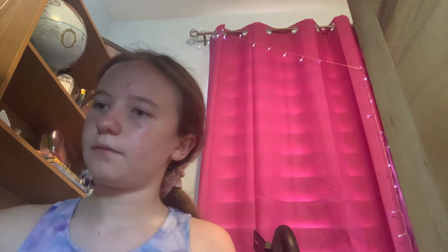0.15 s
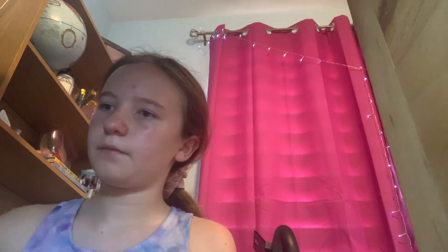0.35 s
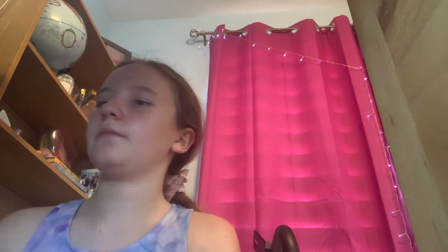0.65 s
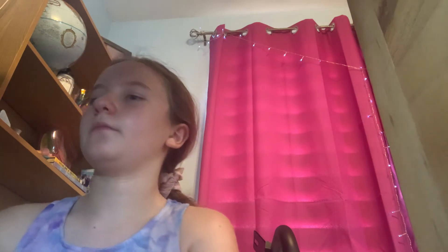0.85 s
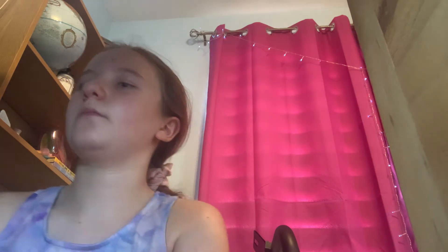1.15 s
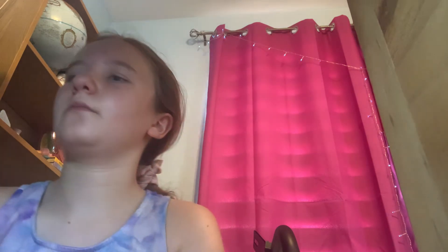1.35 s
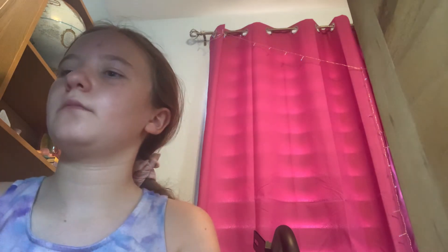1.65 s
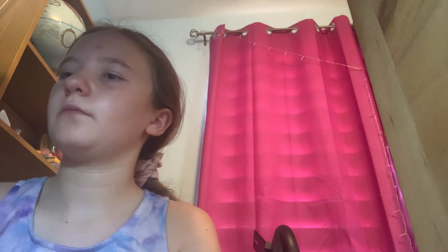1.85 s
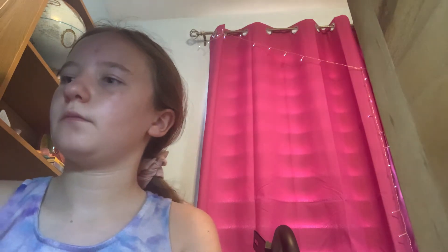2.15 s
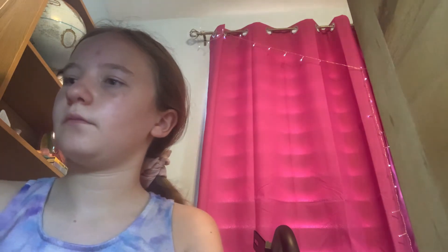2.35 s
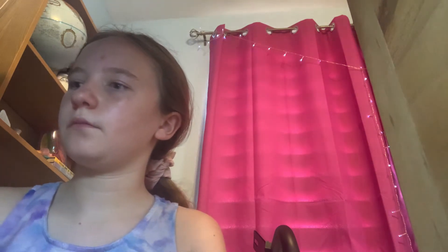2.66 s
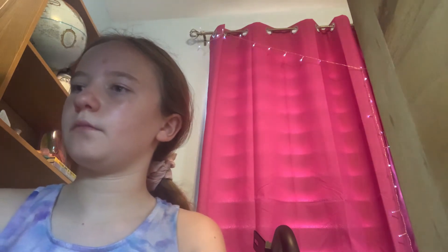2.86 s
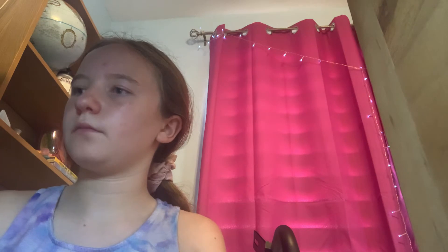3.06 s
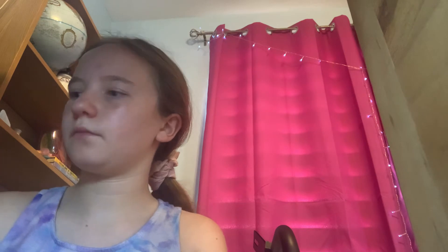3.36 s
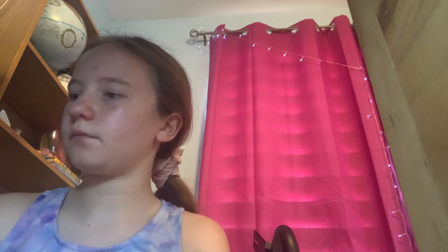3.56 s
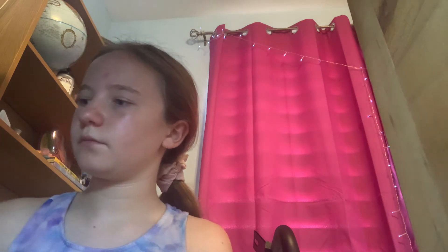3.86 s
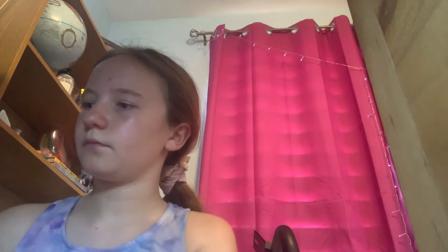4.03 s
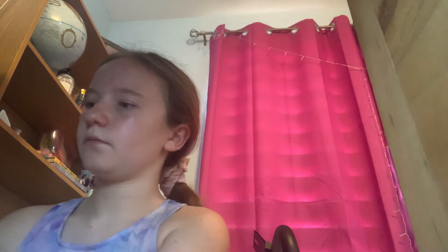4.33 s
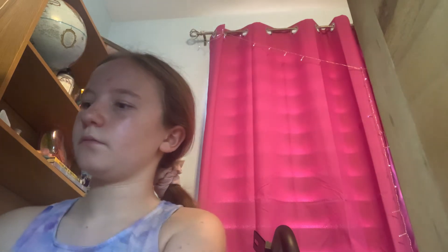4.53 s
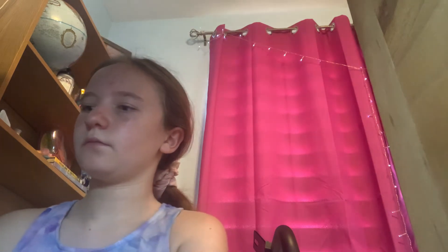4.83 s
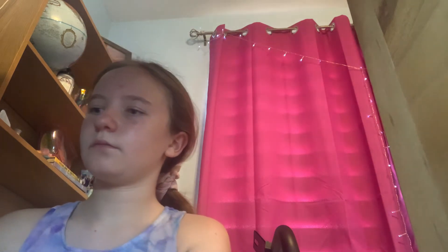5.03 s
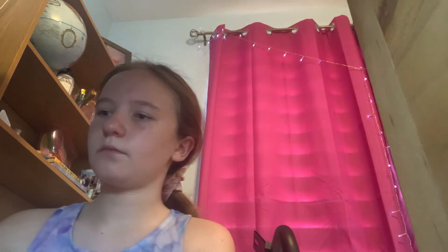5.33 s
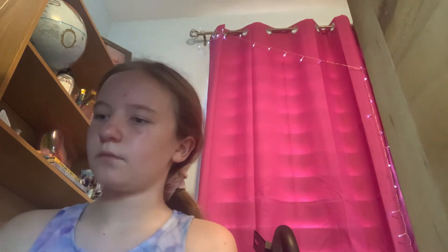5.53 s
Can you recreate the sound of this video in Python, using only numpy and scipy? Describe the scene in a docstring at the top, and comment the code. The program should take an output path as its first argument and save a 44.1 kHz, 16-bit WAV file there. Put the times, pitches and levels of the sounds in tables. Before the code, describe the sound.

A quiet small room with soft air and microphone hiss, faint hum and a thin high whine. From 0 to about 1.2 s, keychains turn in the hand close by, giving tiny irregular metallic clinks and grainy finger rubs. Very soft nudges come near 1.3 s, then a firm, low wooden desk thud at 1.55 s with small ticks. From 1.66 to 1.9 s something drags over the wood in short murmuring scrapes. Bumps and ticks cluster around 1.95-2.15 s, and at 2.19 s a loud, bright, hard double knock lands with a brief jangling spray. The charm rocks from 2.3 to 2.6 s, its taps quickening, dulling and fading. Faint scrapes follow at 2.8-3.05 s, then near silence. Soft rubbing and a nudge return around 3.9 s; a second keychain drags and clatters at 4.25-4.45 s, ending in a duller clack at 4.57 s. Quiet remains, with barely audible ticks at 5.35 and 5.55 s.

```python
"""A small room with a wooden desk, where keychains are put down close to the microphone.
They clink in the hand, the desk is bumped, and one lands with a sharp knock and rocks to rest.
A second one is dragged over the wood, clatters and is set down with a duller clack.
Impacts are decaying modes with a crack of noise; rubbing is coloured noise with tiny catches.
Bending waves in the desk, reflections of the room and a quiet background complete the sound."""
import sys
import numpy as np
from scipy import signal
from scipy.fft import rfft, irfft
from scipy.io import wavfile
from scipy.ndimage import uniform_filter1d

SR = 44100
rng = np.random.default_rng(int(sys.argv[2]) if len(sys.argv) > 2 else 0)


def store_pcm(level_fs):
    """Save levels as 16-bit WAV."""
    pcm = np.round(np.clip(level_fs, -1, 1) * 32767).astype(np.int16)
    wavfile.write(sys.argv[1], SR, np.atleast_2d(pcm).T)


N = 250959
TIME = np.arange(N) / SR


def amp(db):
    """Logarithmic level: decibels to amplitude gain."""
    return 10 ** (np.asarray(db) / 20)


def evened(x):
    """Power normalization: scales to rms 1."""
    return x / np.sqrt(np.mean(x ** 2) + 1e-20)


def read(points, hz, axis=1):
    """Interpolation on a logarithmic frequency axis: reads one column of a table."""
    table = np.transpose(points)
    return np.interp(np.log(hz + 1), np.log(table[0] + 1), table[axis])


def coloured(x, spectrum):
    """Spectral shaping: weights x by a spectrum and scales it to rms 1."""
    gain = amp(read(spectrum, np.fft.rfftfreq(len(x), 1 / SR)))
    return evened(irfft(rfft(x) * gain, len(x)))


def filtered(x, hz, kind, order=2):
    """Butterworth filtering: a maximally flat low-pass or high-pass."""
    corner_hz = np.clip(hz, 10, SR / 2 - 1000)
    return signal.sosfilt(signal.butter(order, corner_hz, kind, fs=SR, output="sos"), x)


def add(mix, s, sound):
    """Superposition: mixes a sound in at time s."""
    part = mix[max(round(s * SR), 0):][:len(sound)]
    part += sound[:len(part)]


VARY_DB = 1.5  # how far the spot struck can raise or lower each mode


def strikes(rows, modes, crack_db, crack_t60, crack_low_hz, detune=0.027, order=3,
            count=0, flurry_s=.01, flurry_db=-6):
    """Modal excitation: each blow rings the modes and a brief crack, under its contact's low-pass corner."""
    out, t = np.zeros(N), np.arange(SR // 3) / SR
    hz, db, t60 = np.transpose(modes)[:, :, None]
    # neighbouring low modes start out of step, so the blow builds up briefly
    lag = np.arange(len(modes))[:, None] * np.pi * 3 / 4
    for s, level_db, corner_hz in rows:
        # every blow lands on another spot or part
        place, part = rng.uniform(-1, 1, (2, len(modes), 1))
        phase = np.where(hz > 1400, rng.uniform(0, 2 * np.pi, hz.shape), -lag)
        decay = amp(db + VARY_DB * place - 60 * t / t60)
        ring = (decay * np.cos(2 * np.pi * hz * (1 + detune * part) * t + phase)).sum(0)
        noise = rng.standard_normal(len(t)) * amp(-60 * t / crack_t60)
        crack = filtered(noise, crack_low_hz, "high")
        impact = ring / np.linalg.norm(ring) + amp(crack_db) * crack / np.linalg.norm(crack)
        first = filtered(impact, corner_hz, "low", order)
        blow = first.copy()
        # loose parts follow in a weaker flurry
        for late in rng.uniform(0.08, 1, count):
            add(blow, late * flurry_s, first * amp(flurry_db * late) * rng.choice([-1, 1]))
        # the level is the rms of the loudest 4 ms
        loudest = np.sqrt(uniform_filter1d(blow ** 2, size=176, mode="constant").max())
        add(out, s, amp(level_db) * blow / loudest)
    return out


def scatter(start, length, per_s, level_db, corner_hz, spread_db=3):
    """Jittered point process: contacts at uneven times and strengths, as (s, level dB, corner Hz)."""
    count = max(round(length * per_s), 0)
    return [(start + length * (k + when) / count, level_db + spread_db * (2 * size - 1), corner_hz)
            for k, (when, size) in enumerate(rng.random((count, 2)))]


def friction(spectrum, catches_per_s, spread_db, smooth_db):
    """Asperity contact: tiny catches of uneven size over a smooth rubbing noise, at rms 1."""
    happens = rng.random(N) < catches_per_s / SR
    sizes = amp(spread_db * np.minimum(rng.exponential(1, N), 3))
    catches = happens * rng.choice([-1, 1], N) * sizes
    return coloured(evened(catches) + amp(smooth_db) * rng.standard_normal(N), spectrum)


# the charm lands on one edge, then slaps flat: (time [s], level [dB], contact corner [Hz])
KNOCK_BLOWS = [(2.1914, -12, 6589), (2.1943, -10.5, 9200), (2.1970, -25, 3594), (2.209, -28.5, 8000),
               (2.2195, -33.5, 5200), (2.228, -36.5, 5500)]
# resonances of the charm: (frequency [Hz], level [dB], t60 [s])
CHARM_RESONANCES = [(338, -8, 0.05), (654, -13, 0.06), (940, -2, 0.021), (1530, 0, .015),
                    (2360, -12.5, .035), (2880, -6, 0.019), (3250, -4, 0.014), (3530, 0, 0.024),
                    (4070, 4, 0.0077), (4470, 5, 0.018), (5300, -1.5, 0.0085), (5830, -0.5, 0.021),
                    (8060, -4.5, .012), (8850, -0.5, 0.012), (10270, -5, 0.014), (11000, -9, 0.021)]


def knocking():
    """Hard impact: the landing charm rings its own short, bright modes."""
    return strikes(KNOCK_BLOWS, CHARM_RESONANCES, crack_db=-3.5, crack_t60=0.043, crack_low_hz=1490,
                   detune=0.0052, order=4)


# spectrum of the chain's spray: (frequency [Hz], relative density [dB per Hz])
SPLASH_SPECTRUM = [(500, -17.5), (1500, -2.5), (3500, 0), (5500, -1), (7000, -7.5), (9000, -10),
                   (11500, -14), (15000, -34)]
SPLASH_TOP_HZ, SPLASH_TOP_T60 = 8000, .28  # above this frequency the spray dies sooner [s]


def splash(level_db=-32.5, t60=0.38):
    """Frequency-dependent damping: the knock shakes the chain into a spray whose top dies first."""
    since = np.maximum(TIME - KNOCK_BLOWS[1][0], 0)
    spray = friction(SPLASH_SPECTRUM, catches_per_s=1200, spread_db=2.5, smooth_db=-6)
    top = irfft(rfft(spray) * (np.fft.rfftfreq(N, 1 / SR) > SPLASH_TOP_HZ), N)
    body = spray - top
    fading = body * amp(-60 * since / t60) + top * amp(-60 * since / SPLASH_TOP_T60)
    return (since > 0) * amp(level_db) * fading


ROCK_START_S = 2.3355
FIRST_GAP_S, LAST_GAP_S, GAP_KEPT = .033, .0195, .7  # the gap shrinks geometrically to its last value
ROCK_DB, ROCK_LOSS_DB = -27.5, 2.4  # first contact, and the loss at each further one
ROCK_CORNER_HZ, CORNER_KEPT = 2280, 0.85  # first corner, and the share each further contact keeps
LIMP_DB = 10.5  # limit of the growing extra loss on every second contact, on the lighter edge


def settling(count=14):
    """Energy loss at impact: the charm rocks edge to edge, ever faster and duller, as it comes to rest."""
    k = np.arange(count)
    gaps = LAST_GAP_S + (FIRST_GAP_S - LAST_GAP_S) * GAP_KEPT ** k
    times = ROCK_START_S + np.cumsum(gaps) - gaps
    limp = (k % 2) * (1 - GAP_KEPT ** k)
    levels_db = ROCK_DB - ROCK_LOSS_DB * k - LIMP_DB * limp
    return list(zip(times, levels_db, ROCK_CORNER_HZ * CORNER_KEPT ** k))


BEND_S = .0036  # 1 kHz travel time; all delays are then taken relative to the fastest wave


def through_desk(x, size=4096):
    """Dispersion: bending waves carry the treble faster than the bass, so each blow sweeps down."""
    hz = np.fft.rfftfreq(size, 1 / SR)
    lag = BEND_S * np.sqrt(1000 / np.clip(hz, 350, 5000))
    # phase is the running sum of delay over frequency
    sweep = irfft(np.exp(-2j * np.pi * np.cumsum(lag - lag.min()) * hz[1]), size)
    return signal.fftconvolve(x, np.roll(sweep, size // 2))[size // 2:][:N]


# the charm's edges touch the wood just before the knock and in the first rocking after it:
# (time [s], level [dB], contact corner [Hz])
EDGE_TOUCHES = [(2.130, -37.5, 3370), (2.149, -24, 2150), (2.197, -26, 996), (2.219, -25.5, 2086),
                (2.232, -27.5, 1220), (2.249, -28.5, 2280), (2.255, -28, 2030), (2.289, -36.5, 1940),
                (2.2995, -28, 1866)]
# resonances of the rocking contacts: (frequency [Hz], level [dB], t60 [s])
ROCK_RESONANCES = [(225, -8, .06), (315, -3.5, .045), (430, -1, .04), (675, -.5, .04), (870, -1.5, .035),
                   (1005, -3, .025), (1430, -4, .018), (1570, 0, .02), (2000, -10, .018), (2420, -6, .024),
                   (2900, -5, .022), (3500, -6, .016)]


def rocking():
    """Repeated impact: edge touches and settling contacts ring the modes through the dispersive desk."""
    contacts = strikes(EDGE_TOUCHES + settling(), ROCK_RESONANCES, crack_db=-7, crack_t60=.05,
                       crack_low_hz=260, detune=.025, count=1, flurry_s=.005, flurry_db=-11)
    return through_desk(contacts)


# a keychain bumping on the wood: (time [s], level [dB], contact corner [Hz])
CLACK_BLOWS = [(1.424, -53.5, 1110), (1.689, -47, 890), (1.752, -44, 1170), (1.794, -50, 2180),
               (1.9815, -30, 2620), (2.005, -38, 2598), (3.019, -55, 1410), (3.054, -61, 1400),
               (3.962, -52, 890), (4.245, -47, 1596), (4.332, -31, 2500), (4.355, -32, 1840),
               (4.386, -34.5, 2000), (4.397, -37.5, 1700), (4.407, -30.5, 2180), (4.419, -36.5, 1400),
               (4.572, -20.5, 2802), (4.577, -30, 940), (4.586, -29, 1184), (4.597, -33.5, 998)]
# resonances of the clacks: (frequency [Hz], level [dB], t60 [s])
CLACK_RESONANCES = [(131.52, -18.5, 0.27), (296.31, -7, 0.026), (497, -3, 0.072), (610, -2.5, 0.057),
                    (810, 1, 0.023), (1156, 2, 0.024), (1410, -3, 0.016), (1990, -1, 0.016),
                    (2320, -3, 0.017), (2820, -0.5, 0.0092), (4400, -5, 0.024)]
SKIPS_PER_S, SKIP_DB, SKIP_CORNER_HZ = 55, -5.5, 1140  # level relative to the rub


def clacking():
    """Soft impact: a keychain bumps on the wood, and skips on it while a push holds."""
    skips = []
    for start, rise, hold, _, rub_db, _, _ in PUSHES:
        skips += scatter(start + rise, hold, SKIPS_PER_S, rub_db + SKIP_DB, SKIP_CORNER_HZ)
    bumps = strikes(CLACK_BLOWS + skips, CLACK_RESONANCES, crack_db=-9.5, crack_t60=0.19,
                    crack_low_hz=400, detune=0.033, count=2, flurry_s=0.011, flurry_db=-14.0)
    return through_desk(bumps)


# resonances of the desk top: (frequency [Hz], level [dB], t60 [s])
DESK_RESONANCES = [(60.9, -26, 0.53), (121, -13, 0.22), (187.5, 2, 0.099), (228, -18.5, 0.46),
                   (280, 4.5, 0.059), (367, -1, 0.048), (587, -1.5, 0.045), (677.1, -8, 0.098),
                   (820, -16, 0.086), (1274, -13, 0.04)]
# a firm blow on the desk top: (time [s], level before the high-pass [dB], contact corner [Hz])
THUD_BLOWS = [(1.5558, -7, 948.6)]


def thudding():
    """Plate resonance: a firm blow excites the low modes of the desk top."""
    blow = strikes(THUD_BLOWS, DESK_RESONANCES, crack_db=-15.0, crack_t60=0.22, crack_low_hz=300)
    return filtered(blow, 140, "high")


# soft nudges against the desk: (time [s], level before the high-pass [dB], contact corner [Hz])
THUMP_BLOWS = [(1.294, -50.5, 71.5), (1.347, -47.5, 113), (1.447, -48, 108), (1.934, -23.5, 171),
               (1.969, -23, 181), (1.987, -21, 205), (2.205, -33.5, 174), (2.255, -31, 173.9),
               (3.963, -41, 111.2), (4.280, -38, 109.5), (4.577, -34.5, 142.1)]


def thumping():
    """Contact low-pass: soft nudges excite the same plate with almost no treble."""
    nudges = strikes(THUMP_BLOWS, DESK_RESONANCES, crack_db=-18.0, crack_t60=.15, crack_low_hz=120.15)
    return filtered(nudges, 45, "high")


# rings and links striking the wood: (time [s], level [dB], contact corner [Hz])
TICK_BLOWS = [(1.555, -46, 6000), (1.566, -41.5, 6493), (1.584, -42.5, 4970), (1.6002, -27.5, 8400),
              (1.603, -36.5, 9000), (1.657, -63, 4200), (1.722, -58, 4200), (1.745, -54.5, 4460),
              (1.794, -56.5, 5400), (1.832, -61.5, 5000), (1.946, -51.5, 4400), (1.964, -40.5, 5370),
              (1.970, -46, 4438), (1.981, -29.5, 4387), (2.004, -39.5, 4380), (2.024, -49.5, 9000),
              (2.036, -47, 3633), (2.041, -43, 3659), (2.047, -39, 4500), (2.051, -43.5, 9960),
              (2.058, -49, 4200), (2.075, -51, 3200), (2.085, -51, 4208), (2.131, -44, 4375),
              (2.143, -38, 6043), (2.157, -37, 4380), (2.308, -46, 12100), (2.474, -59.5, 5990),
              (4.351, -37.5, 7500), (4.356, -38, 10700), (5.346, -63, 13000), (5.542, -59, 13000)]
# resonances of the rings and links: (frequency [Hz], level [dB], t60 [s])
LINK_RESONANCES = [(2200, -8, .015), (2620, -7, .016), (2980, -7, .02), (3720, 2, .016), (4260, -1, .013),
                   (5050, -1, .016), (5750, -3, .012), (8400, -7, .008), (9900, -5, .008)]
LINKS_PER_S, LINK_CORNER_HZ = 80, 4490  # ticks of the trailing links


def ticking():
    """Small-body resonance: rings and links strike the wood, and trailing links tick while a push holds."""
    links = []
    for start, rise, hold, _, _, _, links_db in PUSHES:
        links += scatter(start + rise, hold, LINKS_PER_S, links_db, LINK_CORNER_HZ)
    return strikes(TICK_BLOWS + links, LINK_RESONANCES, crack_db=-4.5, crack_t60=0.035,
                   crack_low_hz=2200, detune=0.03, count=1, flurry_s=.004, flurry_db=-6)


# spectra of the murmuring wood and the hissing surface: (frequency [Hz], relative density [dB per Hz])
RUB_SPECTRUM = [(40, -20), (120, -1), (200, 4), (350, 8.5), (500, -7), (850, -4), (1100, -17.5),
                (1350, -12), (1800, -30), (3000, -29.5), (6000, -53)]
HISS_SPECTRUM = [(900, -9.5), (1800, -2.5), (3600, -3.5), (5600, -6), (7000, -13), (10000, -13.5),
                 (15500, -23)]
SWELL_DB = 16.5  # a push starts this far below its full level
GRIT_DB, GRIT_HZ = 2.8, 140  # depth of the level's jumps, and the upper limit of their rate
# pushes over the desk, each swelling, holding and dying away:
# (start [s], rise [s], hold [s], fade t60 [s], rub [dB], hiss [dB], links [dB])
PUSHES = [(1.662, 0.088, 0.1567, 0.58, -46.5, -70.5, -80), (1.933, 0.047, 0.032, 0.35, -45, -58.5, -46),
          (2.766, 0.038, 0.067, 0.43, -50.5, -69.5, -76), (3.012, 0.0083, .05, .2, -69.5, -78, -80),
          (3.88, 0.073, 0.044, 0.37, -55.5, -71, -64), (4.036, 0.008, 0.0088, 0.2, -56, -54.5, -66),
          (4.238, 0.008, 0.042, 0.21, -49, -64.5, -60), (4.29, 0.004, .02, 0.16, -55.5, -60.5, -60),
          (4.312, 0.058, 0.043, 0.3, -40.5, -55, -51.5), (4.442, 0.075, 0.067, 0.25, -44, -58, -56),
          (4.62, 0.033, 0.042, 0.82, -79, -70.5, -80)]


def sliding():
    """Stick-slip friction: a dragged keychain makes the wood murmur and its own surface hiss."""
    rub = filtered(friction(RUB_SPECTRUM, catches_per_s=1200, spread_db=2, smooth_db=-5.0), 86, "high")
    hiss = friction(HISS_SPECTRUM, catches_per_s=2500, spread_db=3, smooth_db=-2)
    wander = evened(filtered(rng.standard_normal(N), GRIT_HZ, "low"))
    grit = evened(amp(GRIT_DB * np.clip(wander, -2, 2)))
    out = np.zeros(N)
    for start, rise, hold, t60, rub_db, hiss_db, _ in PUSHES:
        t = TIME - start
        swell_db = -SWELL_DB * np.clip(1 - t / rise, 0, 1)
        fade_db = -60 * np.maximum(t - rise - hold, 0) / t60
        out += (t > 0) * amp(swell_db + fade_db) * (rub * amp(rub_db) + hiss * amp(hiss_db))
    return out * grit


SCRAPE_EDGE_S = .003  # how fast a jerk starts and stops
# the dragged charm catches and scrapes on in short jerks: (start [s], length [s], level [dB])
SCRAPE_JERKS = [(1.686, .014, -47.5), (1.744, .036, -44), (1.784, .016, -44), (1.816, .016, -42.5),
                (1.85, .012, -46.5), (1.867, .012, -47.5), (1.881, .036, -45.5), (2.002, 0.023, -41.5),
                (2.038, .024, -45.5), (2.815, 0.063, -51), (2.893, 0.02, -60.5), (2.925, 0.014, -62),
                (2.971, 0.0086, -57), (4.293, .018, -48)]
# resonances of the charm and the wood: (frequency [Hz], bandwidth [Hz], peak level [dB])
SCRAPE_RESONANCES = [(390, 70, 6), (525, 50, 0), (730, 60, 2), (870, 60, 0), (1060, 70, -7), (1310, 60, 1),
                     (2960, 130, -17), (3750, 450, -20), (5650, 400, -26)]


def scraping(catches_per_s=1100, spread_db=2.0):
    """Source and resonator: bursts of tiny catches ring the charm and the wood under it."""
    jerks = np.zeros(N)
    for start, length, db in SCRAPE_JERKS:
        to_edge = np.minimum(TIME - start, start + length - TIME)
        jerks += amp(db) * np.clip(to_edge / SCRAPE_EDGE_S, 0, 1)
    catches = friction([(40, 0), (7000, 0)], catches_per_s, spread_db, smooth_db=-3)
    t = np.arange(SR // 10) / SR
    body = sum(amp(db) * width * np.exp(-np.pi * width * t) * np.sin(2 * np.pi * hz * t)
               for hz, width, db in SCRAPE_RESONANCES)
    ringing = signal.fftconvolve(catches * jerks, body / np.linalg.norm(body))[:N]
    return filtered(ringing, 5300, "low", order=4)


CLINKS_PER_S = 35
# the fingers shift and set off small clinks at random:
# (start [s], length [s], mean level [dB], contact corner [Hz])
FINGER_SHIFTS = [(0.382, 0.147, -65.5, 9000), (0.572, 0.1555, -66, 10000), (0.745, 0.06, -71.5, 8300)]


def fidgeting():
    """Random excitation: small clinks of the keychains turning in the hand."""
    clinks = []
    for start, length, level_db, corner_hz in FINGER_SHIFTS:
        clinks += scatter(start, length, CLINKS_PER_S, level_db, corner_hz)
    return clinks


# the clearest clinks of links in the hand, farther off, and one brush of links on the desk near 4 s: (time [s],
# level [dB], contact corner [Hz])
JINGLE_BLOWS = [(.016, -53, 9000), (.046, -63, 6000), (.086, -65.5, 4500), (.193, -71, 6000),
                (.325, -56.5, 7960), (.360, -54, 7250), (.392, -53.5, 8900), (.474, -56, 12300),
                (.551, -57, 8800), (.628, -51.5, 9700), (.688, -57, 12000), (.711, -56.5, 1770),
                (.815, -63.5, 12200), (.889, -64, 6000), (.932, -67, 5000), (.976, -59, 6900),
                (.997, -51, 9800), (1.005, -59, 9000), (1.059, -60.5, 1623), (1.069, -63, 6000),
                (1.126, -64, 4500), (1.143, -63.5, 1990), (1.345, -56.5, 5000), (1.438, -55, 5000),
                (3.998, -59, 6958)]
# resonances of the links in the hand: (frequency [Hz], level [dB], t60 [s])
JINGLE_RESONANCES = [(988.3, -4, 0.0389), (1343, -17, 0.024), (2380, -13, 0.033), (3540, -5, 0.024),
                     (4260, 0, 0.01395), (5360, -3.5, 0.03), (8240, -0.5, 0.009)]


def jingling():
    """Metal resonance: links clink in the hand and once brush the desk, each clink followed by a weaker flurry."""
    return strikes(JINGLE_BLOWS + fidgeting(), JINGLE_RESONANCES, crack_db=0.5, crack_t60=0.036,
                   crack_low_hz=1487.7, detune=.1, order=2, count=2, flurry_s=0.0082, flurry_db=-8.0)


# fingers rubbing the keychains: (start [s], length [s], level [dB])
FINGER_RUBS = [(0.352, 0.067, -64.5), (0.603, 0.137, -64.5), (0.885, .035, -71), (1.042, 0.04, -68),
               (1.339, .035, -64), (1.411, .045, -64.5)]
# spectrum of that rubbing: (frequency [Hz], relative density [dB per Hz])
RUSTLE_SPECTRUM = [(500, -12.5), (800, 4), (1020, 8), (1400, -7.5), (2000, -9.5), (2800, -10.5),
                   (3800, -0.5), (5200, -7), (7000, -9.5), (10000, -14), (15000, -19)]


def rustling():
    """Amplitude-modulated friction: each turn in the hand is a grainy rub that swells and fades."""
    grain = friction(RUSTLE_SPECTRUM, catches_per_s=900, spread_db=3, smooth_db=-3)
    envelope = np.zeros(N)
    for start, length, db in FINGER_RUBS:
        progress = np.clip((TIME - start) / length, 0, 1)
        envelope += amp(db) * np.sqrt(np.abs(np.sin(np.pi * progress)))
    return grain * envelope


# decay and strength of the reflections: (frequency [Hz], t60 [s], level [dB])
ROOM_DECAY = [(80.38, 0.8, 6), (292, 0.47, -3.5), (700, 0.96, -9), (1510, 0.16, -5), (3460, 0.28, -3.5),
              (7880, 0.13, 1.5), (13853, 0.026, -2.5)]


def room(x, delay_s=0.0052):
    """Reverberation: dense reflections follow after a delay, each band dying at its own speed."""
    hz, t, bands = signal.stft(rng.standard_normal(SR), SR, nperseg=256)
    level_db, t60 = read(ROOM_DECAY, hz, axis=2)[:, None], read(ROOM_DECAY, hz)[:, None]
    reflections = signal.istft(bands * amp(level_db - 60 * t / t60), SR)[1]
    tail = np.r_[np.zeros(round(delay_s * SR)), reflections]
    return signal.fftconvolve(x, tail / np.linalg.norm(tail))[:N]


# spectrum of the still air and microphone hiss: (frequency [Hz], relative density [dB per Hz])
QUIET_SPECTRUM = [(15, -38), (25, -3.5), (116, 2.5), (361, -2.5), (749, -16), (3390, -29), (3780, -24),
                  (4100, -20.5), (4450, -24.5), (7220, -24.5), (7830, -20), (8970, -23), (12400, -25.5),
                  (14600, -27.5), (15800, -52)]
QUIET_DB = -67.5  # rms
# mains hum and electronic whine: (frequency [Hz], rms level [dB])
HUM_AND_WHINE = [(120, -76.5), (4020.3, -77), (8040.6, -87), (12060.9, -90)]


def background():
    """Stationary noise and tones: still air and microphone hiss, a faint hum and a thin whine."""
    lines = sum(np.sqrt(2) * amp(db) * np.sin(2 * np.pi * (hz * TIME + rng.random()))
                for hz, db in HUM_AND_WHINE)
    return lines + amp(QUIET_DB) * coloured(rng.standard_normal(N), QUIET_SPECTRUM)


def scene():
    """Direct and reverberant sound: all sources, those sent to the room each with its own share."""
    knocks, rocks, clacks = knocking(), rocking(), clacking()
    thuds, thumps, ticks = thudding(), thumping(), ticking()
    slides = sliding() + scraping() + rustling()
    jingles = jingling()
    direct = knocks + splash() + rocks + clacks + thuds + thumps + ticks + slides + jingles
    spread = amp(-21.0) * knocks + amp(-14) * rocks + amp(-29.5) * clacks + amp(-29.0) * thuds
    spread += amp(-23.5) * thumps + amp(-22) * ticks + amp(-23.5) * slides + amp(-10) * jingles
    # the desk top spreads the low part of the rocking through the room
    boom = amp(-21.5) * filtered(filtered(rocks, 600, "low"), 110, "high")
    return (direct + room(spread + boom) + background())[None]


EDGE_HZ = 15900  # upper band limit


def record(dry):
    """Transduction: the microphone sheds deep bass and rounds off the highest peaks; then the band limit."""
    thinned = filtered(dry, 38, "high", order=4)
    rounded = thinned / (1 + (thinned / .9) ** 6) ** (1 / 6)
    band_limit = signal.firwin(511, EDGE_HZ, window=("kaiser", 9), fs=SR)
    return signal.oaconvolve(rounded, band_limit[None], "same")


dry = scene()
out = record(dry)
store_pcm(out)
```